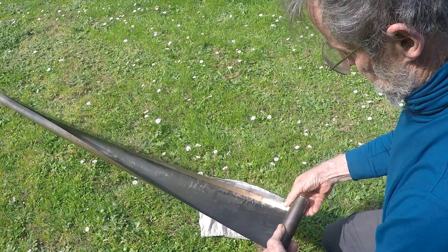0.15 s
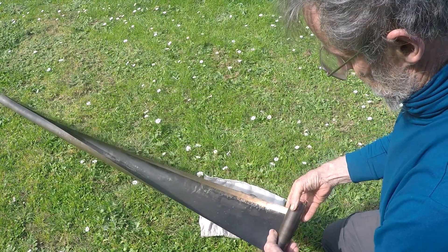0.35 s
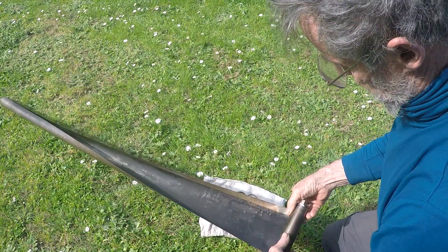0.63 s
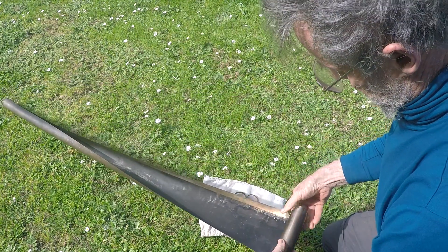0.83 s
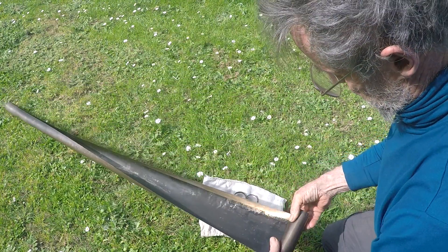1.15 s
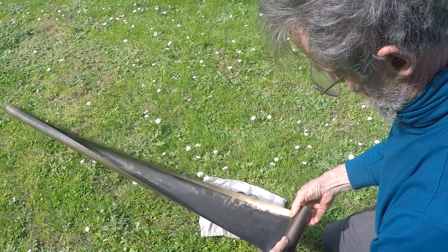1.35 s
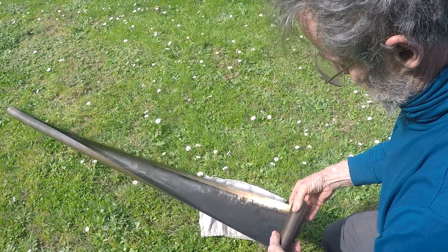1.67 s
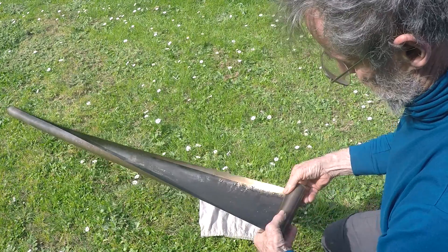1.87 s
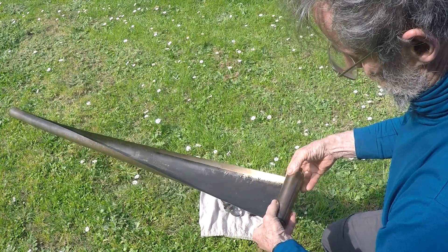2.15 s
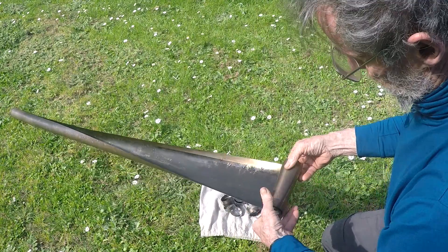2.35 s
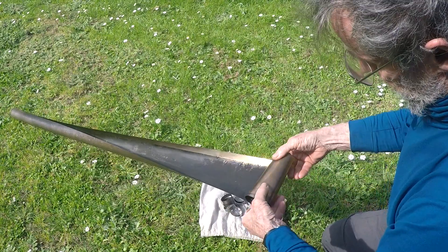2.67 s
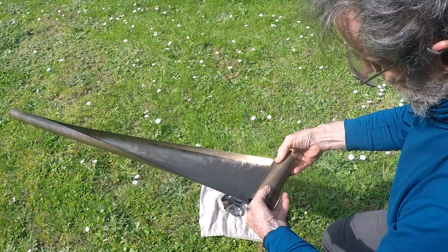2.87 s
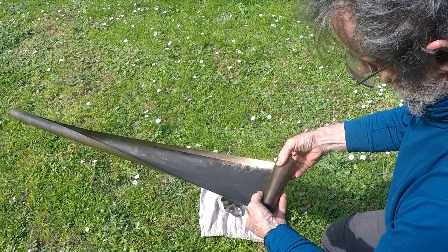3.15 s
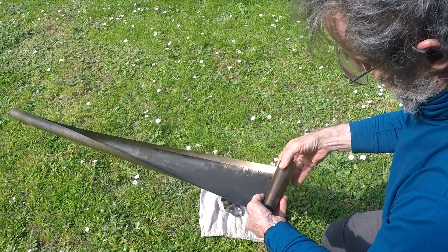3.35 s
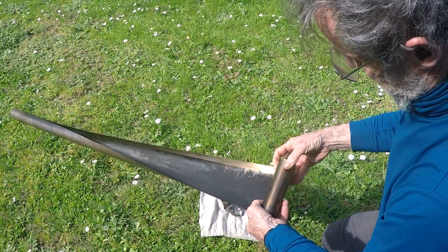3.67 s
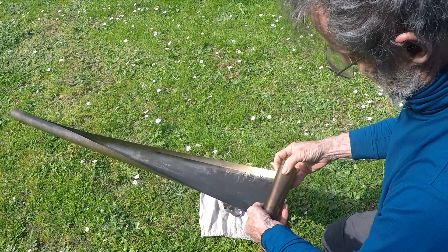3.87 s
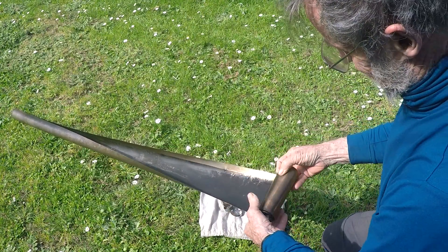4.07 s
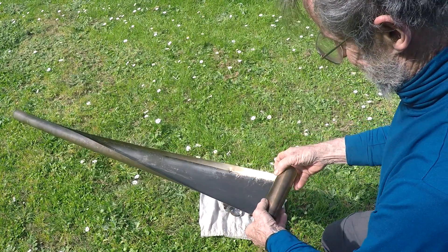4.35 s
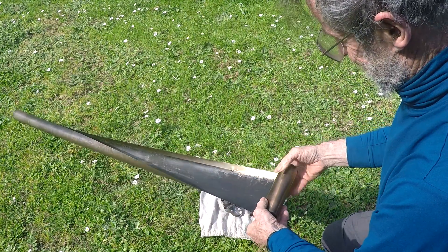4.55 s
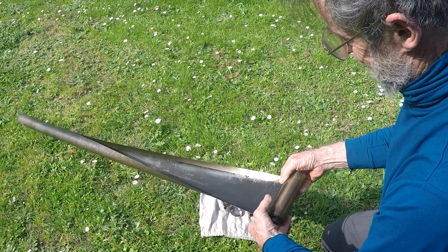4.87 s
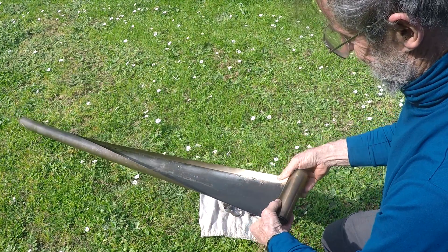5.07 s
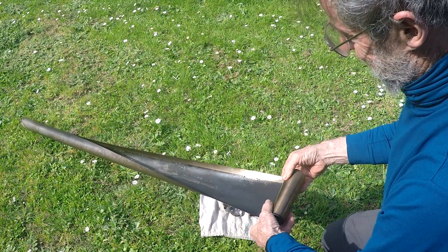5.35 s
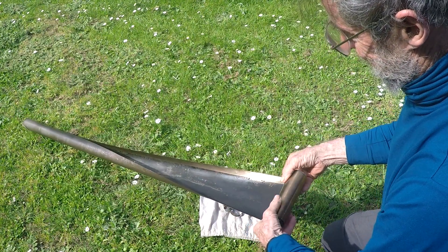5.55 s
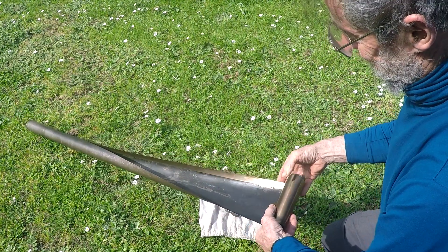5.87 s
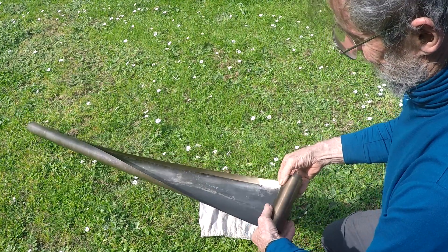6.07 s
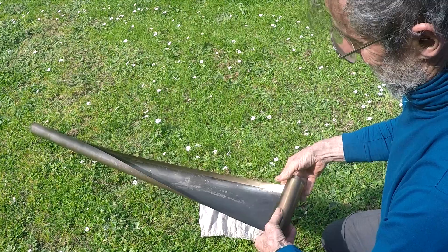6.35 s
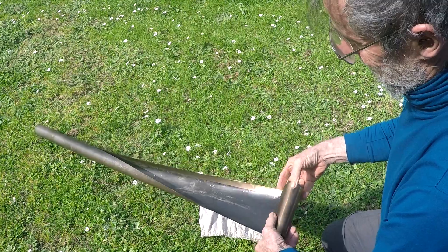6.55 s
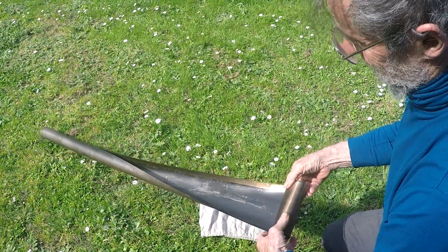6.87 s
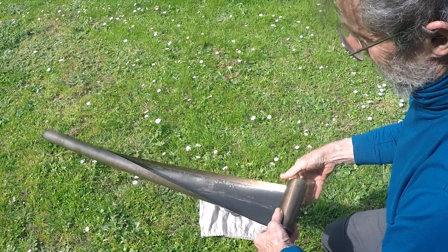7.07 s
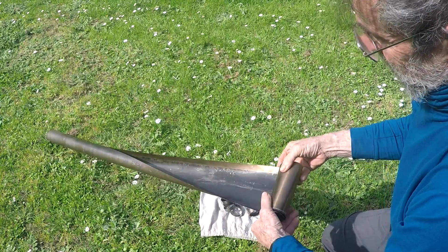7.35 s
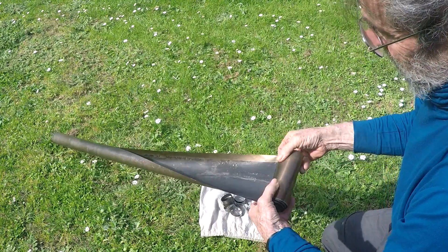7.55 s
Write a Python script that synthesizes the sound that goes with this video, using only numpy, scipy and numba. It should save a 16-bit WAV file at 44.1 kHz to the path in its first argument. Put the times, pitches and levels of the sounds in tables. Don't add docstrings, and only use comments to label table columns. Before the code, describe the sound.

Thin sheet-metal cone crackles, pops and snaps tinnily close by as hands flex and roll it, with soft finger thumps and faint outdoor air.

```python
import sys
import numpy as np
from numba import njit
from scipy import signal
from scipy.fft import rfft, irfft
from scipy.io import wavfile
from scipy.ndimage import uniform_filter1d

SR = 44100
rng = np.random.default_rng(int(sys.argv[2]) if len(sys.argv) > 2 else 0)


def put_to_file(sound):
    columns = np.atleast_2d(sound).T
    safe = np.clip(columns, -1, 1)
    whole_steps = np.round(safe * 32767)
    wavfile.write(sys.argv[1], SR, whole_steps.astype(np.int16))


def invert_db(x):
    u = np.asarray(x, float) / 20
    return 10 ** u


N = 340452

# start in seconds, level below 2.5 kHz in dB,
# 2.7-4.2 kHz share in dB, treble share in dB, swell time in ms.
SNAPS = [(0.0, -31.5, 3.5, -2.5, 1.47), (0.185, -27.5, 0, -4, 11.2), (0.377, -34, -0.5, -5, 4.64),
         (0.521, -27, 3.5, -1.5, 2.85), (0.654, -28, 0, -2, 4.7), (0.871, -30.5, -4, -9, 3.6),
         (1.246, -31.5, 2, -7, 18), (1.46, -31, -2, -4, 3.6), (2.15, -28, 2, -2, 3.94),
         (2.688, -31.5, 2.5, -6.5, 7.2), (4.598, -26.5, 6.5, -5, 2.48), (4.762, -29, -1.5, -11, 7.56),
         (5.133, -31.5, -1, -12.5, 11.4), (5.225, -27.5, 5.5, -5, 5.3), (5.48, -28.5, 3, -3, 5.7),
         (5.781, -27.5, 0, -6, 9.6), (6.099, -31.5, -0.5, -3, 4.6), (6.486, -31, 0.5, -6.5, 3.9),
         (6.731, -35, 0, 0, 7.6), (6.933, -32.5, -1.5, -3, 8.1), (7.447, -31, 2.5, -4.5, 1.41),
         (7.523, -28.5, 1.5, -8, 2.83), (7.559, -33, 6, -2.5, 6.3), (7.69, -30.5, 5.5, -1, 3.2)]
# start in seconds, level in dB, 2.7-4.2 kHz share in dB, swell time in ms.
DENTS = [(0.241, -34, -1, 1.63), (0.8, -62, -8, 2.7), (1.664, -63, -3, 2.5), (1.791, -44.5, -2, 2.33),
         (2.464, -42.5, -9, 22), (2.479, -35.5, -4.5, 9.1), (2.501, -35, 2, 2.54), (3.049, -43, -2, 2.07),
         (3.419, -58.5, -18, 5.2), (3.85, -58.5, -11, 5), (4.105, -37, 0, 3), (4.177, -37, 4.5, 2.7),
         (4.379, -56.5, -14, 4.6), (4.434, -36, -2.5, 1.04), (4.742, -38.5, -11, 14), (5.054, -65, 5, 2.6),
         (5.328, -36.5, -1, 2.7), (5.603, -39.5, 2, 1.1), (5.678, -34.5, -0.5, 3), (6.389, -35.5, -6, 7.9),
         (6.774, -35.5, 1.5, 1.86), (7.268, -64, -2, 1.5)]
# start in seconds, level in dB, 2.7-4.2 kHz share in dB,
# swell time in ms.
YIELDS = [(0.631, -35.5, -26, 6.8), (1.718, -52, -15, 19), (1.749, -35.5, -15, 4.9),
          (1.77, -38.5, -18, 7.4), (2.085, -55, -22, 2.5), (2.329, -40, -16.5, 10), (2.408, -44.5, -14, 12),
          (2.942, -48.5, -19, 5.8), (3.016, -43, -8, 6), (3.24, -47, -18, 11), (3.289, -43, -5.5, 3.7),
          (3.568, -39.5, -15, 9), (3.605, -40.5, -9, 6), (3.669, -49, -14, 1.4), (4.027, -35, -4, 6.7),
          (4.078, -37.5, -6, 4.7), (5.373, -40, -23, 1.3), (5.968, -42.5, -18, 10.8),
          (5.985, -45.5, -7, 6.7), (6.175, -34.5, -8, 9.5), (6.294, -53, -16, 8.8),
          (6.366, -39.5, -12, 4.9), (6.553, -33, -4, 3), (6.64, -40.5, -12, 2.9), (6.685, -40, -3, 12.5),
          (6.847, -36, -8, 7.3), (6.899, -43, -1.5, 3.7), (7.038, -33.5, -16, 10), (7.365, -48, -11, 7.6),
          (7.403, -36.5, -7, 4.7)]
# time in seconds, ring time factor.
GRIP = [(0.0, 0.88), (.9, 0.94), (1.6, 0.86), (2.3, .93), (3.0, 0.89), (3.7, 0.65), (4.2, 0.83),
        (4.7, 0.92), (5.4, 0.77), (6.0, 0.87), (6.6, 0.82), (7.0, 0.66), (7.7, 0.75)]
# time in seconds,
# level moved from 1.1 to 1.8 kHz in dB.
MOUTH = [(0.0, 5), (.6, 2), (1.2, 3), (1.8, -0.5), (2.5, 4.5), (3.2, -1), (4.0, 0.5), (4.7, 2.5),
         (5.4, 0.5), (6.2, -1), (7.0, -2.5), (7.7, 2)]
# time in seconds, level in dB.
RUBBING = [(0.0, -43), (0.2, -66), (0.62, -55), (1.03, -55), (1.4, -59), (1.95, -64), (2.72, -58),
           (3.05, -71), (4.1, -62), (4.55, -68), (4.75, -39.5), (4.92, -62), (5.2, -57), (5.68, -55.5),
           (5.92, -63), (7.1, -64), (7.25, -68), (7.6, -48)]
# frequency in Hz, level in dB per Hz.
SHEET_COLOUR = [(88, -55), (150, -29), (326, -20.5), (736, -19.5), (1060, 0.5), (1290, -3), (1730, -7),
                (2270, -4), (2600, -7.5), (3280, -2.5), (4650, -12), (5440, -10.5), (6110, -12),
                (12500, -31.5), (15500, -41)]
# centre in Hz, width in Hz, gain in dB.
CONE_BANDS = [(964, 75, 3.5), (1754, 127, 7), (2283, 29, 1.5), (2445, 50, -9), (2664, 91, -10),
              (3120, 64, -3), (3750, 135, 1), (4190, 41, -4), (4800, 170, -2), (5350, 290, 6),
              (5950, 67, -7), (6770, 117, -17), (6825, 203, 9.5), (7560, 94, -2.5)]
# frequency in Hz, time to fall 60 dB in seconds.
RING_TIME = [
    (200, 0.52),
    (800, 0.42),
    (2100, 0.34),
    (5500, 0.21),
    (14600, 0.099),
]
# start in seconds, peak in dB, pitch in Hz.
THUMPS = [(0.186, -41.5, 280), (0.523, -44, 248), (0.651, -55, 317), (0.871, -47, 269), (1.457, -45, 310),
          (2.149, -39, 357), (2.461, -42, 294), (2.689, -41, 205), (3.569, -49, 240), (4.022, -47.5, 248),
          (4.436, -48, 355), (4.594, -56, 423), (4.76, -40.5, 305), (5.135, -42, 290), (5.225, -43, 475),
          (5.366, -47, 404), (5.477, -41, 166), (5.603, -54, 413), (5.785, -44, 211), (6.098, -39, 312),
          (6.484, -62, 434), (6.772, -54, 357), (7.04, -46, 243), (7.402, -50, 167)]
# start in seconds, peak in dB, pitch in Hz.
EDGE_TICKS = [(0.2359, -31, 5400), (0.521, -37, 5270), (1.2525, -26, 5640), (1.4606, -25, 5500),
              (1.5858, -48, 5290), (1.7908, -41, 5170), (2.5037, -29, 5330), (3.05, -34, 5140),
              (3.2894, -55, 5240), (4.1071, -38, 5320), (4.179, -25, 4940), (4.3944, -58, 5770),
              (4.4144, -50, 5440), (4.7486, -32, 4550), (5.4864, -27, 5170), (5.605, -32, 5270),
              (6.102, -27, 5620), (6.398, -33, 5100), (6.6987, -42, 5080), (6.7396, -28, 5120),
              (6.776, -27, 5640), (6.9406, -33, 5350), (7.449, -14.5, 4860), (7.5662, -25, 5260),
              (7.6904, -19, 5420)]
# frequency in Hz, level in dB per Hz.
AIR_COLOUR = [(12, -36), (20, 7), (90, -5), (308, -12.5), (481, -15.5), (795, -18), (1890, -23),
              (3590, -20), (4490, -24), (14500, -32.5), (15800, -49)]

MODE_COUNT, SLIP_COUNT = 1300, 11


def sheet():
    hz, colour = modes()
    start_s, low_db, mid_db, top_db, ring_factor, swell_ms = buckles()[:, :, None]
    count = len(start_s)
    above_top = 1 / (1 + (4400 / hz) ** 8)
    brief = np.arange(MODE_COUNT) % 4 == 0
    crack_db = brief * (3 - np.log2(swell_ms / 4))
    spot_db = 1.67 * 5 * uniform_filter1d(rng.standard_normal((count, MODE_COUNT)), size=30, axis=1)
    tilt_db = brightness(hz, above_top, start_s, mid_db, top_db)
    gain = colour * invert_db(low_db + 3 + tilt_db + spot_db + crack_db)

    bend = 0.00297
    buckle_detune = bend * rng.standard_normal((count, 1, MODE_COUNT))
    slip_detune = bend * rng.standard_normal((count, SLIP_COUNT, MODE_COUNT))
    turn = 2 * np.pi * hz * (1 + buckle_detune + slip_detune) / SR
    turn = turn.reshape(-1, MODE_COUNT)
    t60_s = on_log(RING_TIME, hz) * ring_factor.clip(2 / 3) * np.where(brief, 0.13, 1)
    fade = np.exp(-np.log(1000) / (t60_s * SR))

    part, size, at = slips(start_s, swell_ms)
    early = invert_db(-13 * (1 - part).clip(0)[:, :, None] * above_top)
    push = rng.standard_normal((count, SLIP_COUNT, MODE_COUNT))
    kick = (gain[:, None] * push * size[:, :, None] * early).reshape(len(at), -1)
    order = np.argsort(at, kind="stable")
    slip_fade, slip_turn = fade[order // SLIP_COUNT], turn[order]

    build_up = np.sqrt(1 - fade.mean(axis=0) ** 2)
    touch = colour * build_up * invert_db(-9 * above_top) * rng.standard_normal(MODE_COUNT)
    parts = kick[order], slip_fade * np.cos(slip_turn), slip_fade * np.sin(slip_turn), rubbing(), touch
    return radiate(ring(at[order], *(p.astype(np.float32) for p in parts)), SHEET_COLOUR)


def modes():
    crowding = 1.35
    place = (np.arange(MODE_COUNT) + rng.random(MODE_COUNT)) / MODE_COUNT
    hz = 150 + 15300 * place ** crowding
    cone_db = sum(db * np.exp(-.5 * ((hz - f) / width) ** 2) for f, width, db in CONE_BANDS)
    colour = invert_db(cone_db) * place ** ((crowding - 1) / 2)
    heard = colour * invert_db(on_log(SHEET_COLOUR, hz))
    return hz, colour / np.sqrt(np.sum(heard[hz < 2500] ** 2))


def buckles():
    groups = [np.array(SNAPS).T]
    # base in dB, slope
    for table, base_db, slope in (DENTS, -7, 0.65), (YIELDS, -17, 0.93):
        start_s, low_db, mid_db, swell_ms = np.transpose(table)
        groups.append([start_s, low_db, mid_db, base_db + slope * mid_db, swell_ms])
    start_s, low_db, mid_db, top_db, swell_ms = np.hstack(groups)
    ring_factor = np.interp(start_s, *np.transpose(GRIP))
    return np.array([start_s, low_db, mid_db, top_db, ring_factor, swell_ms])


def brightness(hz, above_top, start_s, mid_db, top_db):
    above_mid = 1 / (1 + (2500 / hz) ** 8)
    middle_db = (above_mid - above_top) * (mid_db + 6.5)
    treble_db = above_top * (top_db + 9.5) * (hz / 6000) ** 0.94
    upper_band = np.exp(-.5 * ((hz - 1780) / 200) ** 2)
    lower_band = np.exp(-.5 * ((hz - 1080) / 170) ** 2)
    mouth_db = np.interp(start_s, *np.transpose(MOUTH)) * (upper_band - 0.28 * lower_band)
    return middle_db + treble_db + mouth_db


def slips(start_s, swell_ms):
    shape = (len(start_s), SLIP_COUNT)
    delay = .4 * rng.standard_normal(shape).clip(0, 2)
    part = 3.3 * ((np.arange(SLIP_COUNT) + delay) / SLIP_COUNT) ** 1.4
    size = (part + .2) * np.exp(-1.6 * part) * invert_db(4 * rng.standard_normal(shape))
    size /= np.sqrt(np.sum(size ** 2, axis=1, keepdims=True))
    wait_ms = part * (swell_ms.clip(1) + 1.5) + 60 * (part / 3.3) ** 4
    at = ((start_s + wait_ms / 1000) * SR).astype(int).ravel()
    return part, size, at


def rubbing():
    time_s, level_db = np.transpose(RUBBING)
    level_db = np.interp(np.arange(N) / SR, time_s, level_db)
    return rng.standard_normal(N) * invert_db(level_db - 3 + 3.8 * walk(28))


@njit(fastmath=True)
def ring(at, kick, cos, sin, rub, touch):
    out = np.zeros(len(rub))
    re, im = np.zeros_like(touch), np.zeros_like(touch)
    slip = -1
    for i in range(len(rub)):
        while slip + 1 < len(at) and at[slip + 1] <= i:
            slip += 1
            re += kick[slip]
        c, s = cos[max(slip, 0)], sin[max(slip, 0)]
        total = np.float32(0)
        for m in range(len(touch)):
            r = re[m] * c[m] - im[m] * s[m] + rub[i] * touch[m]
            im[m] = re[m] * s[m] + im[m] * c[m]
            re[m] = r
            total += im[m]
        out[i] = total
    return out


def radiate(x, table):
    hz = np.maximum(np.arange(1025) * SR / 2048, 1)
    cepstrum = irfft(np.log(invert_db(on_log(table, hz))))
    cepstrum[1:1024] *= 2
    cepstrum[1025:] = 0
    response = irfft(np.exp(rfft(cepstrum)))
    return signal.fftconvolve(x, response)[:len(x)]


def fingertips():
    return knocks(THUMPS, t60_s=0.074, push_ms=5.4, gain_db=-4, spread=0.94)


def rolled_edge():
    return knocks(EDGE_TICKS, t60_s=0.019, push_ms=0.53, gain_db=-7, spread=0.28)


def knocks(table, t60_s, push_ms, gain_db, spread):
    out = np.zeros(N + 8000)
    t = np.arange(8000) / SR
    shape = (1 - np.exp(-t * 1000 / push_ms)) * np.exp(-np.log(1000) * t / t60_s)
    for start_s, peak_db, hz in table:
        tone = np.zeros(len(t))
        for detune, phase in rng.random((4, 2)):
            tone += np.sin(2 * np.pi * (hz * (1 - spread / 2 + spread * detune) * t) + 2 * np.pi * phase)
        first = int(start_s * SR)
        out[first:first + len(t)] += invert_db(peak_db + gain_db) * tone * shape
    return out[:N]


def air():
    wind = shaped(AIR_COLOUR, 21, 150) * invert_db(1.2 * walk(3))
    garden = shaped(AIR_COLOUR, 150, 800) * invert_db(1.7 * walk(4.69))
    hiss = shaped(AIR_COLOUR, 800, 16500)
    both = wind + garden + hiss
    return both * invert_db(-59.5) / np.sqrt(np.mean(both ** 2))


def shaped(table, lo_hz, hi_hz):
    hz = np.maximum(np.arange(N // 2 + 1) * SR / N, 1)
    gain = invert_db(on_log(table, hz)) * (hz >= lo_hz) * (hz < hi_hz)
    return irfft(rfft(rng.standard_normal(N)) * gain, N)


def on_log(table, hz):
    f, value = np.transpose(table)
    return np.interp(np.log(hz), np.log(f), value)


def walk(rate):
    hold = int(SR / rate)
    steps = np.repeat(rng.standard_normal(N // hold + 1), hold)
    return 1.5 * uniform_filter1d(uniform_filter1d(steps, hold), hold)[:N]


def scene():
    return (sheet() + fingertips() + rolled_edge() + air())[None]


def top_cut(x):
    return signal.sosfilt(signal.butter(12, 15900, fs=SR, output="sos"), x)


def record(dry):
    low_pass = signal.ellip(8, .3, 45, 15500, fs=SR, output="sos")
    mix = signal.sosfilt(low_pass, dry)
    return top_cut(mix)


dry = scene()
out = record(dry)
put_to_file(out)
```